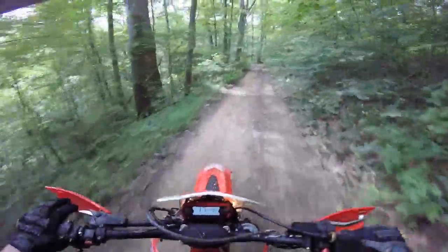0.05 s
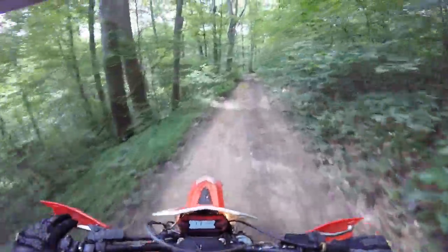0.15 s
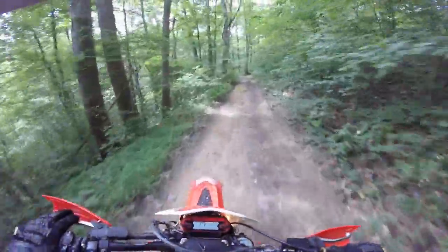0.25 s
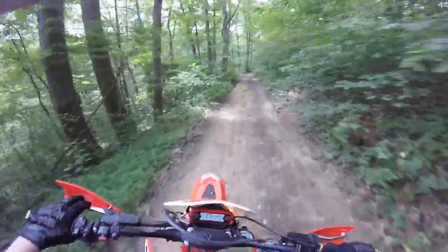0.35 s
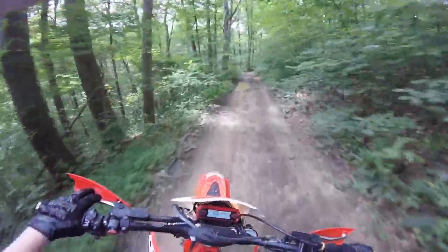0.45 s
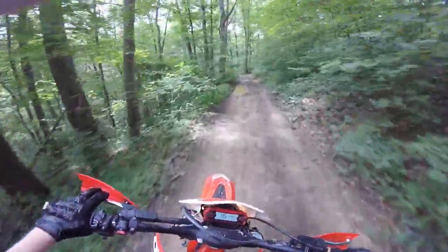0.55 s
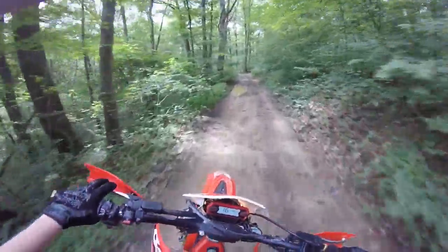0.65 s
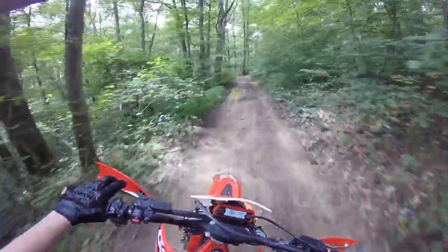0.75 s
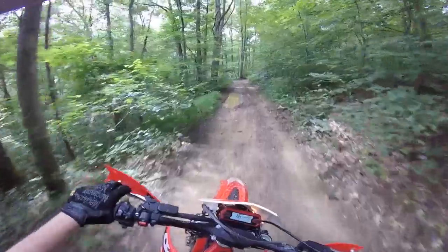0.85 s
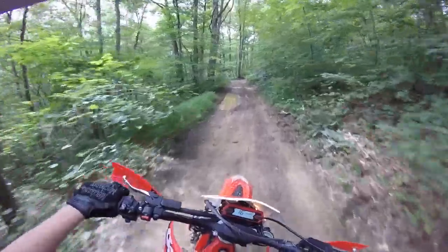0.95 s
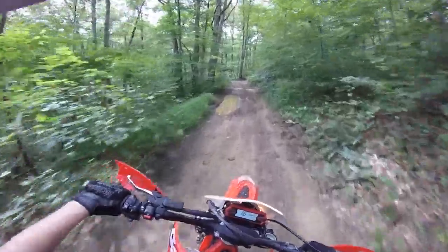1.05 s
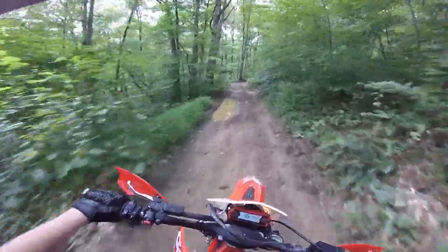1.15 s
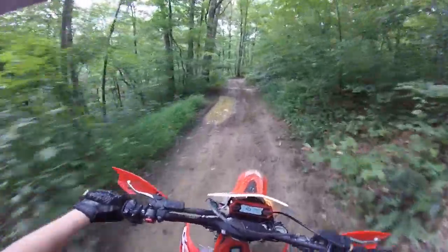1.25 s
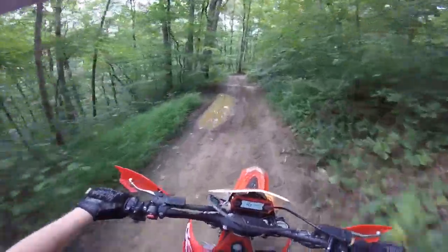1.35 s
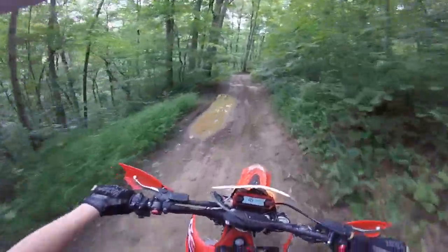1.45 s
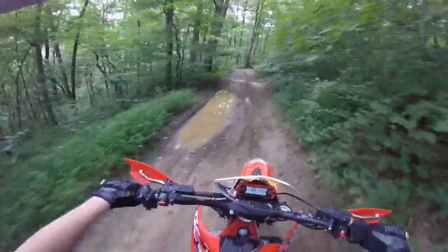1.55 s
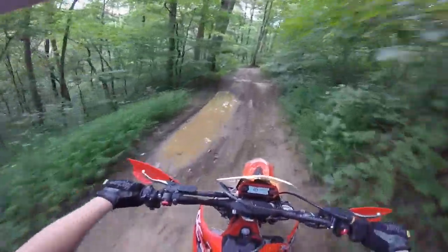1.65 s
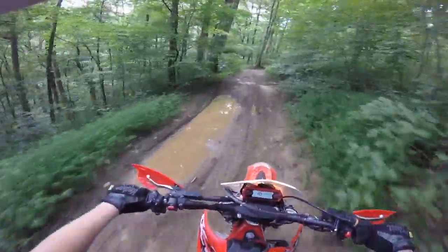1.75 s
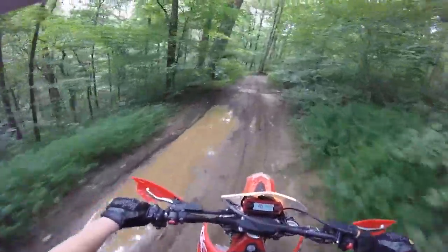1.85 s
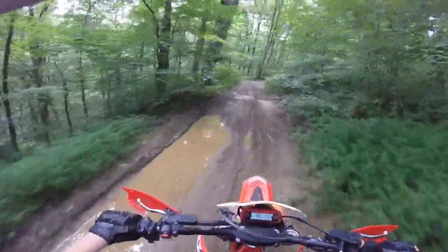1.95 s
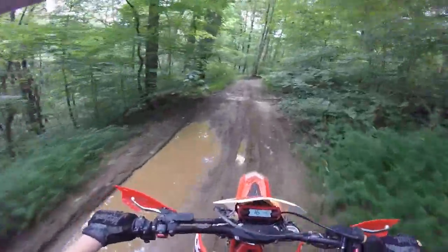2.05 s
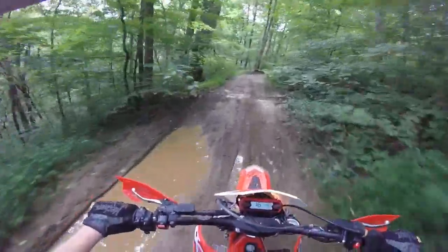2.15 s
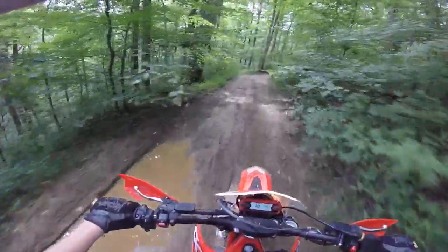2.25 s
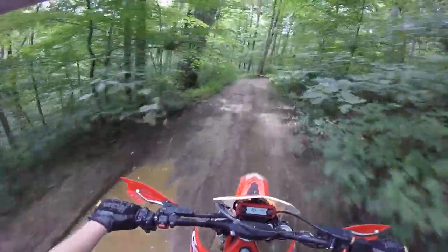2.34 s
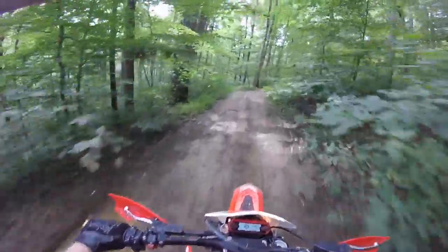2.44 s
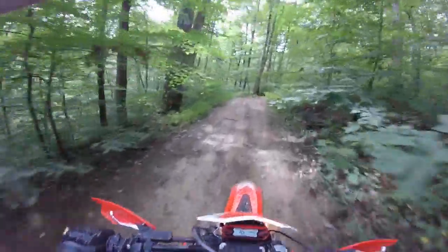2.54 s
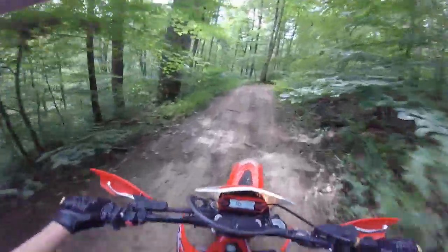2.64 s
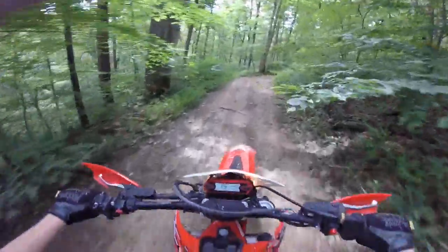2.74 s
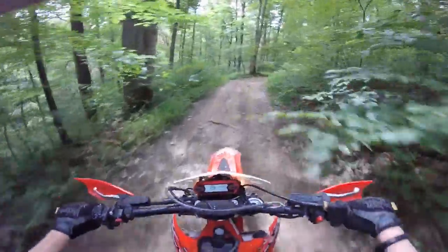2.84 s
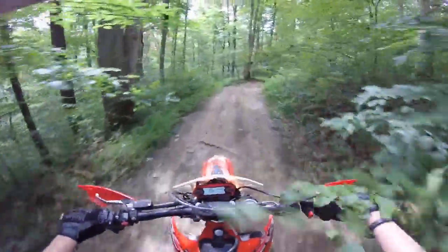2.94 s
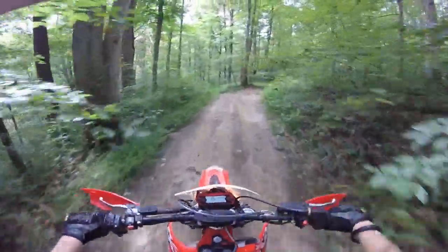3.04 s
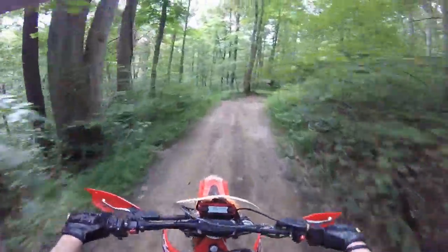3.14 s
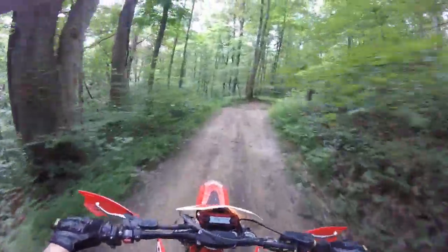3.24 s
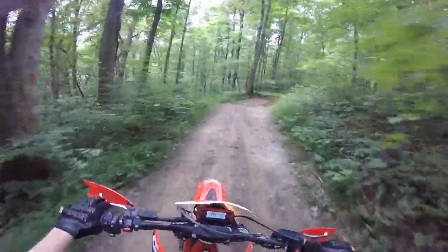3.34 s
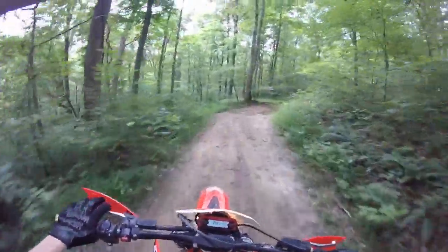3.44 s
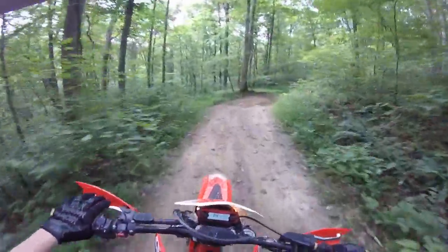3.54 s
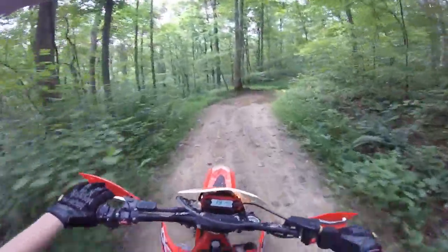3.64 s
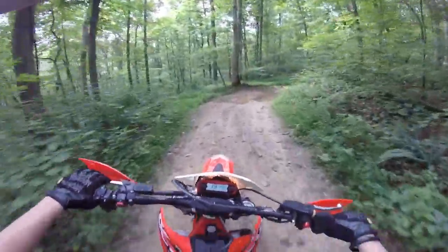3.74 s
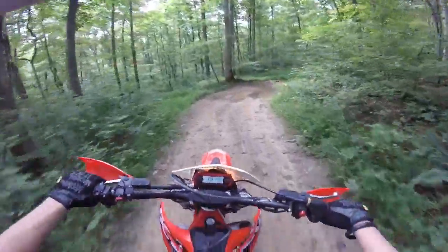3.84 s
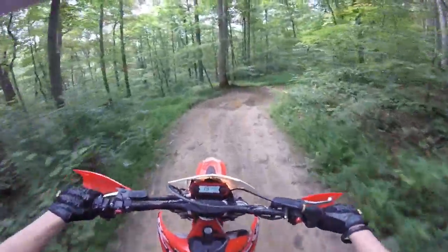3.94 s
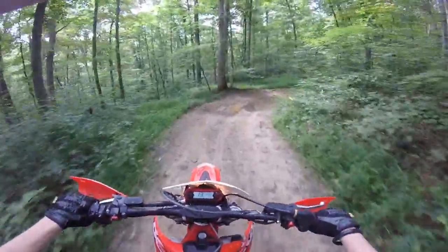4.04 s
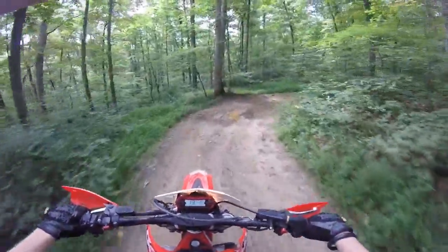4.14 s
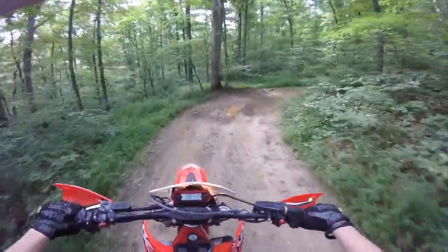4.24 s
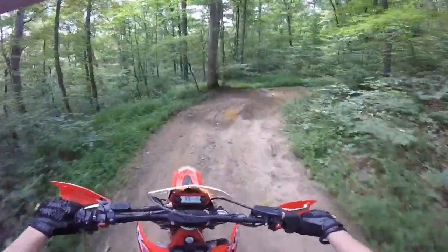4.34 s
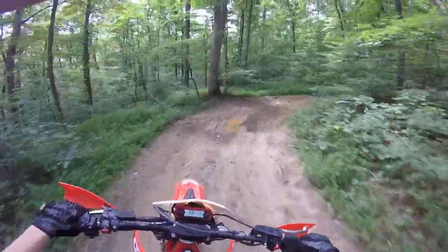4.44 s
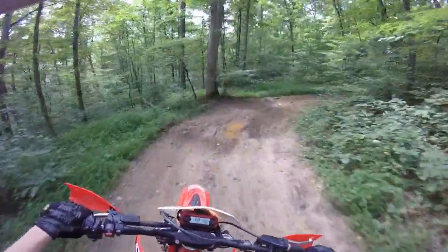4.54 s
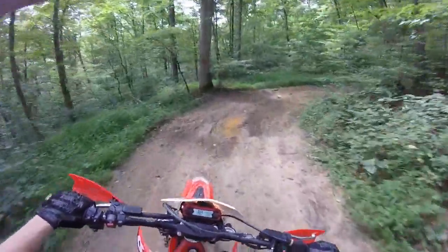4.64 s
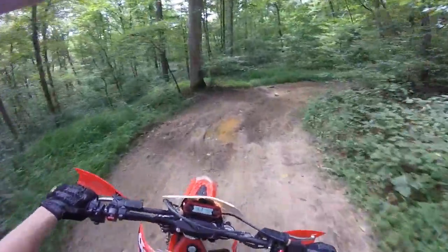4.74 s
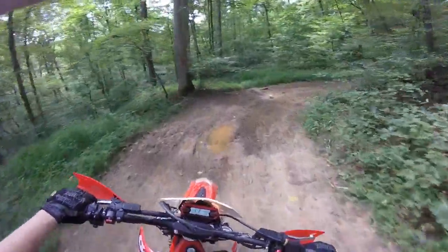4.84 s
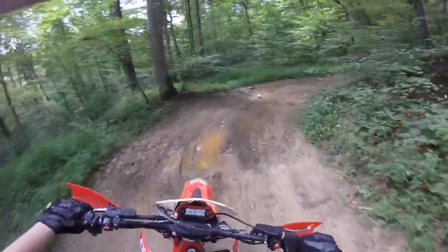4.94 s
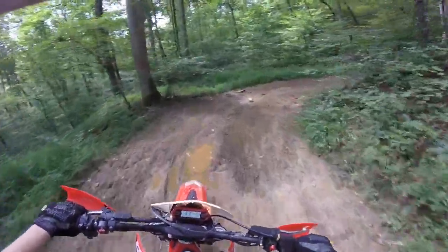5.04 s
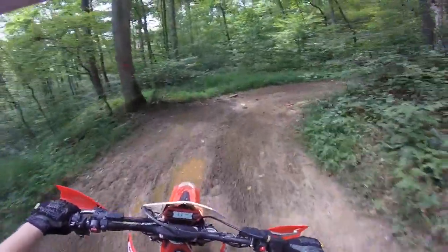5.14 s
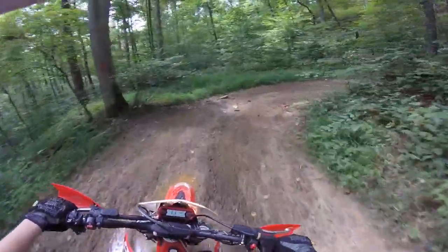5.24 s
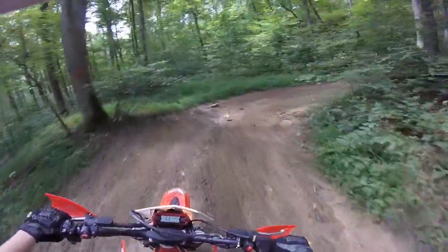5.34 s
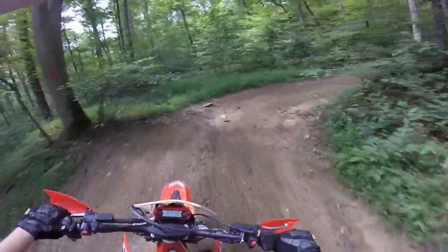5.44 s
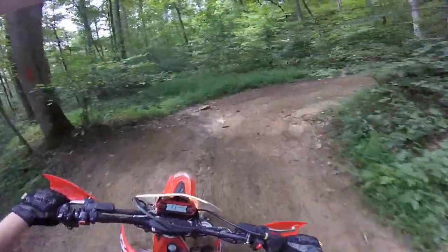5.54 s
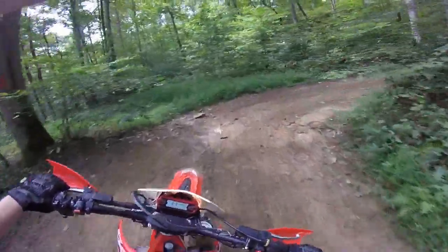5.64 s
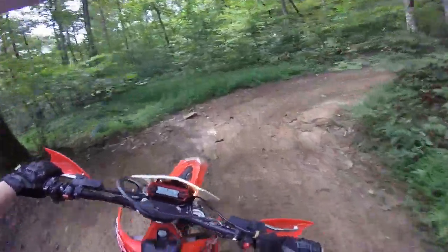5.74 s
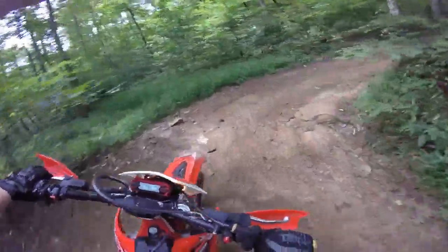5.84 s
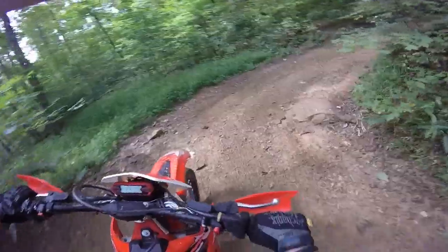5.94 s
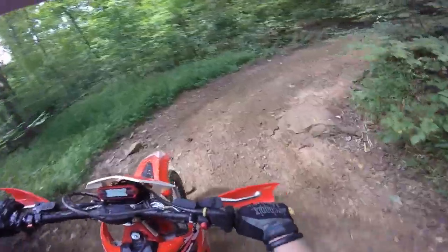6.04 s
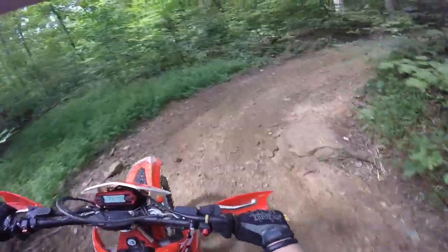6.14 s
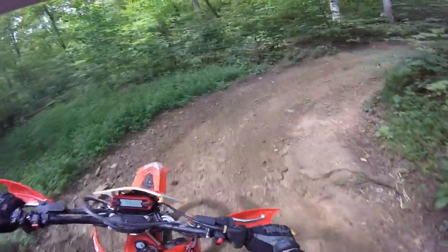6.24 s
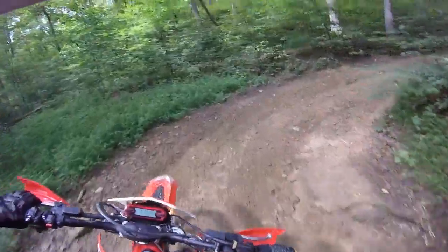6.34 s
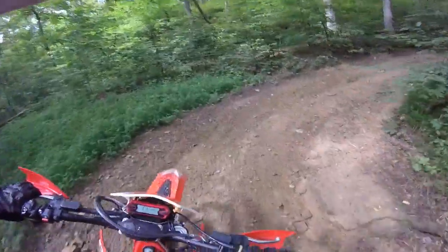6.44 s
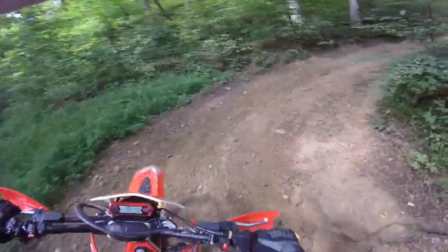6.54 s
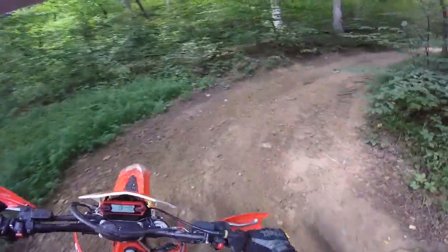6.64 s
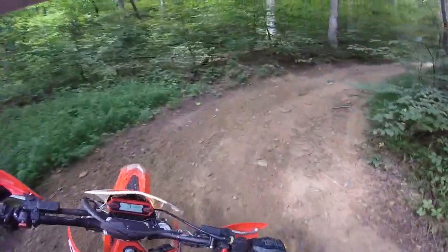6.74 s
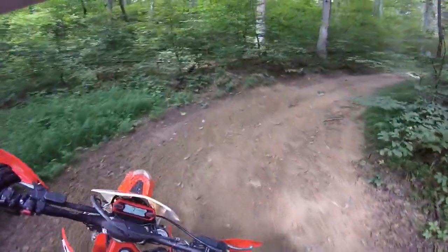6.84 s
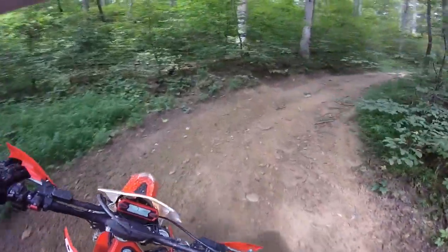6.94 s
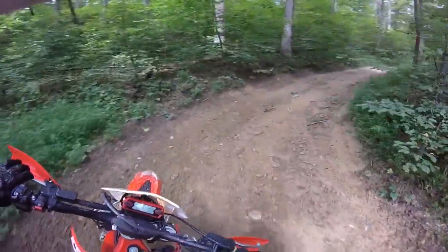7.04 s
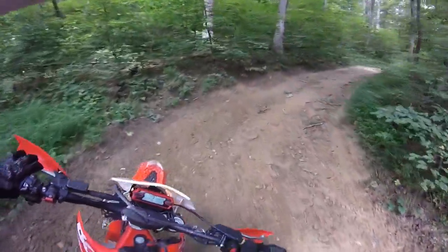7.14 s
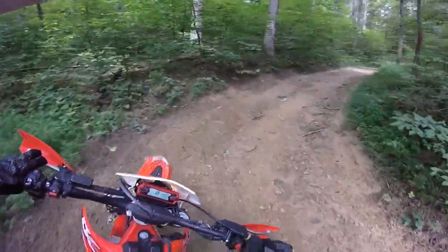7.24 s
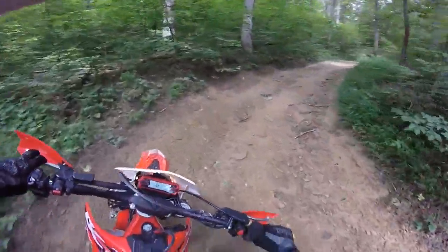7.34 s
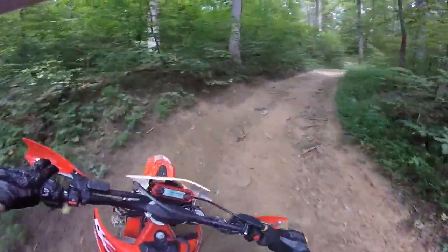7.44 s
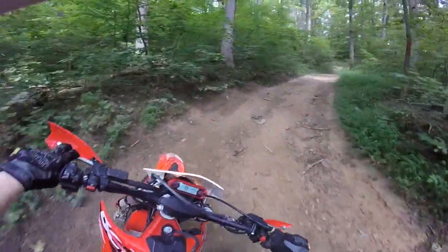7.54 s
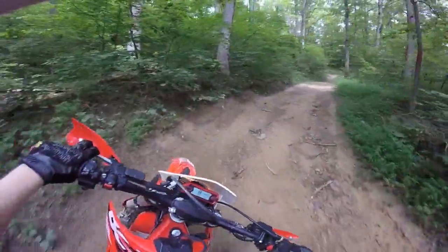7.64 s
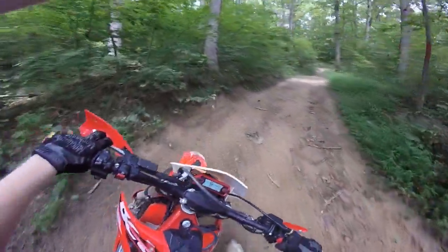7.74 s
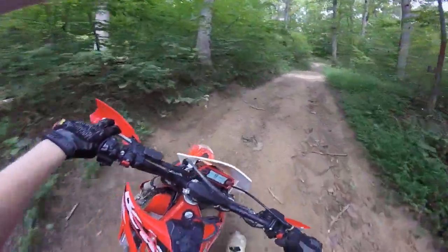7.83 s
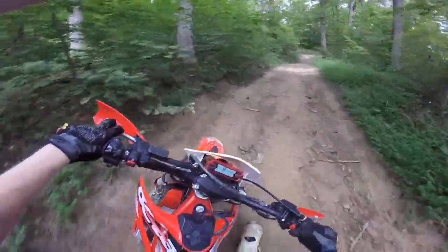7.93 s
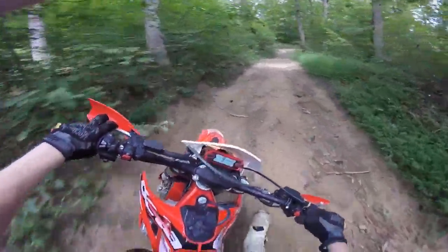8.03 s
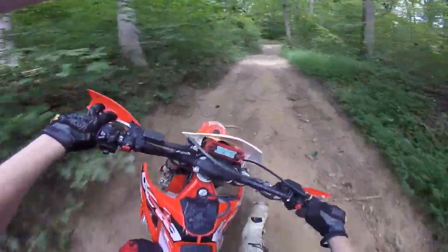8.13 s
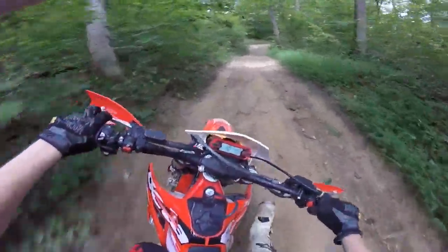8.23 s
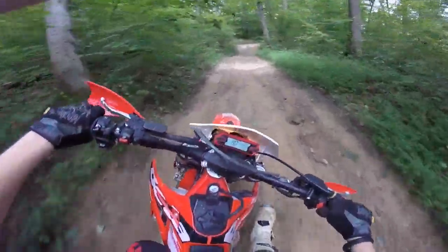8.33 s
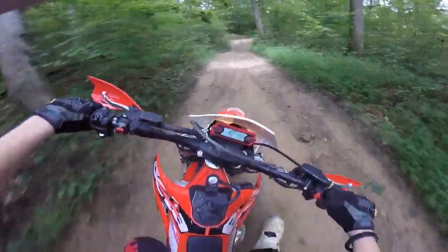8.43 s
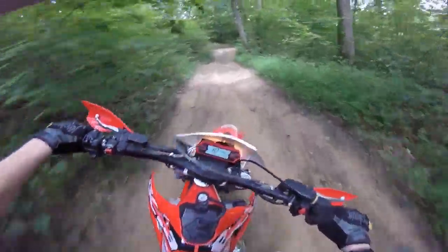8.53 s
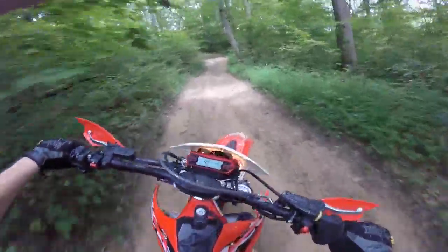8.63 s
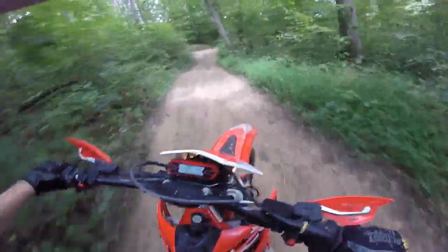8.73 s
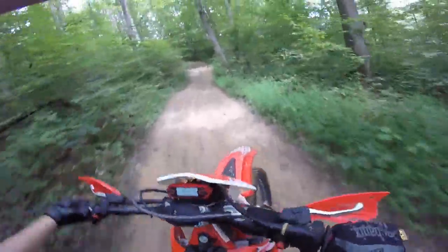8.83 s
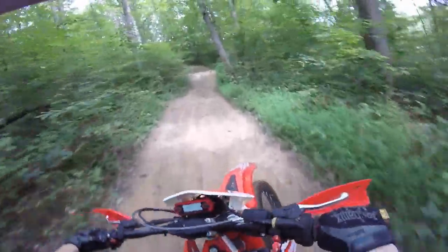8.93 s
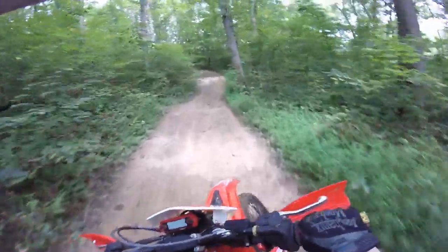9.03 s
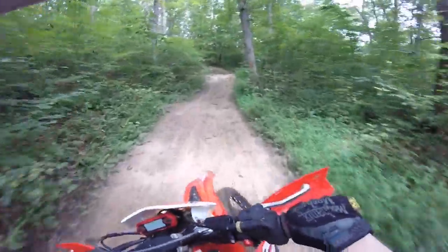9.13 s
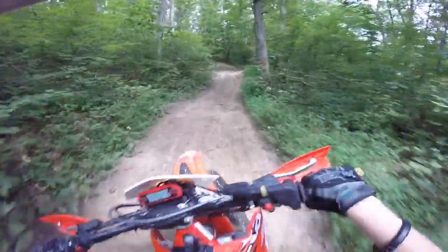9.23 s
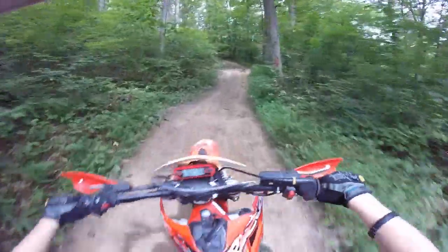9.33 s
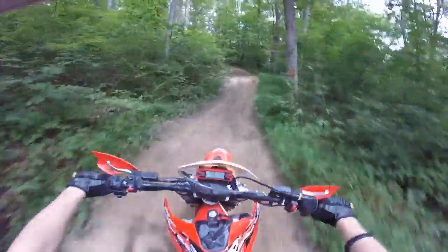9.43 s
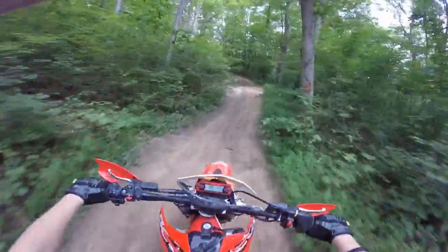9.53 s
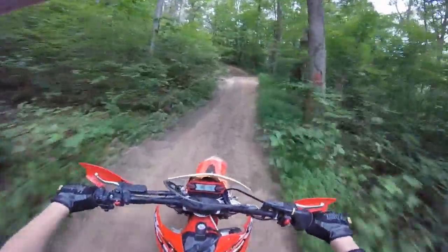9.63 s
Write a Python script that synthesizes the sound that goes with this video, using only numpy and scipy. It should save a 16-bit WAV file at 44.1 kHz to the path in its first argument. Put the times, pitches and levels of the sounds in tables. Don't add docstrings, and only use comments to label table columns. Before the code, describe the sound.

Close on-board sound of a small two-stroke dirt bike on a wooded dirt trail, slightly boxed in by a helmet camera housing. The engine hums off throttle with irregular popping, slowing toward a bend amid chain rustle, low wind and grit ticks. Bumps knock around four seconds, the tyre scrapes gravel just after five, then the engine burbles, blips and pulls up to a high buzzing rasp.

```python
import sys
import numpy as np
from scipy import signal
from scipy.io import wavfile
from scipy.ndimage import uniform_filter1d

SR = 44100
rng = np.random.default_rng(int(sys.argv[2]) if len(sys.argv) > 2 else 0)


def transcribe(signal):
    frames = np.atleast_2d(signal).T
    limited = np.clip(frames, -1, 1)
    pcm = np.round(limited * 32767).astype(np.int16)
    wavfile.write(sys.argv[1], SR, pcm)


def volts_from_db(level):
    exponent = np.asarray(level, float) / 20
    return 10 ** exponent


N = 426888
TIME = np.arange(N) / SR


def rms_one(x):
    return x / np.sqrt(np.mean(x ** 2) + 1e-20)


def in_time(rows, outside=None):
    s, *columns = np.transpose(rows)
    return [np.interp(TIME, s, c, outside, outside) for c in columns]


def span(from_s, to_s, edge_s):
    inside_s = np.minimum(TIME[::40] - from_s, to_s - TIME[::40])
    return np.clip(inside_s / edge_s + .5, 0, 1)


def drift(rate_hz):
    r = np.exp(-80 * np.pi * rate_hz / SR)
    white = rng.standard_normal(N // 40 + 2002)
    slow = signal.lfilter([1], [1, -2 * r, r * r], white)[2000:]
    return np.interp(np.arange(N) / 40, np.arange(len(slow)), rms_one(slow))


def train(at, sizes):
    out = np.full(N, 1e-18)
    np.add.at(out, np.clip(at, 0, N - 1).astype(int), sizes)
    return out


def ring(clicks, hz, t60_s):
    r, w = volts_from_db(-60 / (t60_s * SR)), 2 * np.pi * hz / SR
    return signal.lfilter([0, np.sin(w)], [1, -2 * r * np.cos(w), r * r], clicks)


def stamp(clicks, shape):
    ms = np.arange(-1500, 1501) * 1000 / SR
    return signal.oaconvolve(clicks, shape(ms), "same")


def bandpass(x, low_hz, high_hz):
    return signal.sosfilt(signal.butter(2, [low_hz, high_hz], "band", fs=SR, output="sos"), x)


def resonate(x, hz, width_hz):
    return signal.lfilter(*signal.iirpeak(hz, hz / width_hz, fs=SR), x)


def noise(spectrum, patchy_db):
    hz, db = np.transpose(spectrum)
    bands = int(2.5 * np.log2(hz[-1] / hz[0]))
    edges = np.geomspace(hz[0], min(hz[-1], .45 * SR), bands + 1)
    white, together, out = rng.standard_normal((2, N)), drift(0.57), 0
    for k, (low, high) in enumerate(zip(edges, edges[1:])):
        band = bandpass(white[k % 2], low, high)
        level_db = np.interp(np.log(low * high) / 2, np.log(hz), db)
        out = out + band * volts_from_db(level_db + patchy_db * (0.37 * together + drift(7.3)))
    return rms_one(out)


# (time [s], speed [turns/s])
CRANK_SPEED = [(0.0, 52.5), (1.0, 51.7), (1.32, 50.0), (1.65, 52.3), (2.0, 49.8), (2.75, 49.6),
               (3.21, 40.7), (3.39, 45.0), (3.67, 42.2), (4.18, 37.6), (4.8, 35.3), (5.6, 34.4),
               (5.9, 36.9), (6.17, 44.0), (6.73, 49.4), (6.88, 44.8), (7.39, 40.2), (9.68, 60.8)]
# (time [s], speed [turns/s], firing [dB], exhaust hiss [dB])
PULLS = [
    [(7.1, 44.5, -27.5, -44), (7.27, 41.5, -31, -42.5)],
    [(7.75, 44.9, -26, -44), (7.9, 45.8, -27.5, -38.5), (8.0, 52.0, -22, -40.5), (8.07, 55.2, -25.5, -46),
     (8.19, 50.8, -37, -50)],
    [(8.19, 50.8, -30, -46), (8.27, 56.6, -26, -42.5), (8.34, 54.6, -31, -48), (8.41, 59.4, -23.5, -44),
     (8.54, 61.8, -25.5, -45), (8.63, 67.8, -26.5, -42.5), (8.75, 70.5, -24.5, -41)],
    [(9.09, 58.5, -28, -63), (9.11, 59.0, -19, -42), (9.15, 63.0, -20.5, -43), (9.2, 75.5, -26, -46),
     (9.25, 81.5, -21.5, -44.5), (9.34, 74.8, -27.5, -43), (9.47, 73.6, -23.5, -43)],
]
# (first [s], last [s], firings
# [count], pop peak [dB], hiss [dB])
MISFIRE_RUNS = [(1.3665, 1.443, 3, -2.5, -38), (1.4608, 1.5738, 4, -1, -37), (1.6324, 1.7085, 3, -1, -37.5),
                (1.766, 1.804, 2, -1.5, -41.5), (1.8236, 1.8803, 2, -2, -37.5),
                (2.919, 2.9548, 2, -1.5, -34), (4.5341, 4.618, 2, -5.5, -54), (4.8114, 4.978, 2, -1.5, -32),
                (5.175, 5.3159, 2, -3, -37), (5.4567, 5.6334, 4, -5, -40), (5.8832, 6.2341, 6, -2.2, -34.5),
                (6.5102, 6.595, 3, -0.4, -32.5), (6.735, 6.8806, 2, -14.5, -39.5),
                (6.975, 7.0246, 2, -1, -35.5), (7.2983, 7.5421, 6, -3.5, -34),
                (7.589, 7.7361, 4, -4, -36.5), (9.4869, 9.611, 3, -2.2, -41.5)]
# (time [s], pop peak [dB], exhaust hiss [dB])
LONE_POPS = [(1.349, -4, -40), (1.7475, -4, -41), (2.5209, 1, -35), (2.614, 1.5, -39), (2.6317, -1, -39),
             (3.0165, -13, -34), (4.264, 0, -32.5), (5.805, -5.5, -41), (6.3242, -7.5, -36.5),
             (6.6567, -5, -40), (7.0905, -4, -40), (8.7705, -5, -36)]
POP_SPREAD_DB, FLYWHEEL_S = 1.0, .03


def crank():
    rate_hz, = in_time(sorted(CRANK_SPEED + [row[:2] for rows in PULLS for row in rows]))
    rate_hz = uniform_filter1d(rate_hz, size=int(FLYWHEEL_S * SR))
    free = np.cumsum(rate_hz) / SR
    turn, last, marks, pops = 0, 0, [], []
    lone_runs = [(s, s, 1, *db) for s, *db in LONE_POPS]
    for first_s, last_s, count, *db in sorted(MISFIRE_RUNS + lone_runs):
        start, end = np.interp([first_s, last_s], TIME, free)
        turn += max(round(start - last), 1)
        step = round((end - start) / max(count - 1, 1))
        pops += [(turn + step * k, *db) for k in range(count)]
        marks += [(start, turn - start), (end, pops[-1][0] - end)]
        turn, last = pops[-1][0], end
    angle = free + np.interp(free, *np.transpose(marks))
    pops = np.array(pops)
    pops[:, 0] = np.interp(pops[:, 0], angle, TIME)
    pops[:, 1:] += POP_SPREAD_DB * rng.standard_normal((len(pops), 2))
    return angle, rate_hz, pops


def passes(angle, share):
    return np.interp(np.arange(1, int(angle[-1])) + share, angle, np.arange(N)).astype(int)


# (from [s], to [s], puff boost [dB], puff pitch [Hz], puff decay [ms])
THROTTLE = [(1.357, 1.895, 4.5, 236, 10.4), (1.918, 2.03, -6, 283, 4.1), (2.5, 2.646, 4, 270, 2.5),
            (2.853, 2.946, 11, 296, 4.1), (4.35, 5.2, 2, 302, 1.9), (5.2, 5.794, 2, 330, 4.2),
            (5.801, 6.26, 8.5, 291, 2.7), (6.446, 6.63, 7, 273, 3.7), (6.94, 7.275, 10, 269, 16),
            (7.275, 7.75, 14, 264.4, 12), (7.758, 7.986, 13, 265, 16), (8.003, 8.48, 13, 281, 3.6),
            (8.476, 8.73, 12, 268, 7.1), (8.793, 9.087, -11, 300, 7.1), (9.095, 9.21, 8.5, 265, 20),
            (9.19, 9.397, 0, 320, 21), (9.4, 9.48, -2, 270, 4.2), (9.492, 9.7, -5, 262, 9.3)]
THROTTLE_MOVE_S, COAST_HZ, COAST_DECAY_MS = 0.051, 294, 5.5


def throttle():
    out = np.array([[0], [COAST_HZ], [COAST_DECAY_MS]])
    for from_s, to_s, boost_db, hz, ms in THROTTLE:
        change = [boost_db, hz - COAST_HZ, ms - COAST_DECAY_MS]
        out = out + np.outer(change, span(from_s, to_s, THROTTLE_MOVE_S))
    return [np.interp(TIME, TIME[::40], row) for row in out]


ROUGH_COAST, ROUGH_MISFIRE, ROUGH_PULL = .08, .2, .04


def roughness():
    misfire = np.max([span(row[0] - .1, row[1] + .1, .1) for row in MISFIRE_RUNS], axis=0)
    load = np.max([span(rows[0][0], rows[-1][0], .05) for rows in PULLS], axis=0)
    off_load = ROUGH_COAST + (ROUGH_MISFIRE - ROUGH_COAST) * misfire
    return np.interp(TIME, TIME[::40], off_load * (1 - load) + ROUGH_PULL * load)


# (frequency [Hz], level [dB], t60 [s])
PIPE = [(94, -16.5, 0.019), (241, -10.5, 0.014), (425.7, -12, 0.1), (609.5, -6, 0.027), (707, -15.5, 0.061),
        (1384, -20.5, 0.025)]


def firing(at, size):
    out = stamp(train(at, size), lambda ms: np.exp(-(ms / .5) ** 2))
    for k, (hz, level_db, t60_s) in enumerate(PIPE):
        strikes = train(at + int(0.00078 * SR), size * volts_from_db(level_db + rng.normal(0, 1, len(at))))
        out = out + (-1) ** k * ring(strikes, hz, t60_s)
    return bandpass(out, 45, 1500)


LAZY_HZ = 38
LAZY_RING_HZ, LAZY_T60_S, LAZY_RING_DB = 330, 0.042, 3


def lazy_pops(pops):
    clicks = train(pops[:, 0] * SR, volts_from_db(pops[:, 1] + LAZY_RING_DB))
    push = stamp(clicks, lambda ms: np.exp(-(ms / 0.21) ** 2))
    return 0.4 * push + ring(push / (.0008 * SR), LAZY_RING_HZ, LAZY_T60_S)


# (frequency [Hz], level [dB/Hz])
BLOWDOWN = [(1500, 1), (3000, 0), (5000, -10.5), (7000, 4.5), (9000, -25.5), (12000, 14), (15500, -55)]


def blowdown(at, size):
    def puff(ms):
        return np.exp(-np.maximum(ms, 0) / 8.8 - (np.minimum(ms + 1.8, 0) / 2.9) ** 2)
    return stamp(train(at, size), puff) * noise(BLOWDOWN, patchy_db=2.0)


# (order [multiple of crank], level [dB re firing])
LOW_ORDERS = [(1, -3), (2, -7.5), (3, -19), (7, -4), (8, 2)]
BARK_HZ, BARK_T60_S, BARK_DB = 632, .06, -10


def exhaust(angle, opens, rough, pops, lazy):
    s, pop_db, pop_hiss_db = pops.T
    load_db, flow_db = np.max([in_time(rows, outside=-120)[1:] for rows in PULLS], axis=0)
    uneven_db = 5 * rough[opens] * rng.standard_normal(len(opens))
    fire_db = load_db[opens] + 17.5 + uneven_db
    at = np.concatenate([s * SR, opens]).astype(int)
    throb = sum(volts_from_db(level_db) * np.sin(2 * np.pi * order * angle) for order, level_db in LOW_ORDERS)
    throb = throb * uniform_filter1d(volts_from_db(load_db), size=1500)
    bark = ring(train(s * SR + 60, volts_from_db(pop_db + BARK_DB) * ~lazy), BARK_HZ, BARK_T60_S)
    hiss = blowdown(at, volts_from_db(np.r_[pop_hiss_db + 3.0, flow_db[opens] + 5.0]))
    fired = firing(at, volts_from_db(np.r_[pop_db - 1.5 - 9.0 * lazy, fire_db]))
    return fired + lazy_pops(pops[lazy]) + bark + hiss + throb


PUFF_DB = -8.5


def pumping(angle, opens, puff_db, rough, pitch_hz, decay_ms):
    chance = rng.standard_normal((len(opens), 2))
    start = opens + chance[:, 0] * rough[opens] * .0008 * SR
    size = volts_from_db(puff_db[opens] + 10.4 * rough[opens] * chance[:, 1])
    out = 0
    for back in (-1, 0, 1):
        turn = np.clip(np.round(angle).astype(int) - 1 - back, 0, len(opens) - 1)
        ms = (np.arange(N) - start[turn]) * 1000 / SR + 1.66
        swell = np.exp(-(np.minimum(ms, 0) / 2.96) ** 2 - np.maximum(ms - 1.5, 0) / decay_ms)
        out = out - size[turn] * swell * np.cos(2 * np.pi * pitch_hz[opens][turn] * ms / 1000)
    return out


# (speed [turns/s], piston knock [dB], reed snap [dB])
BY_SPEED = [(34, -28, -29), (37, -28, -17), (41.25, -33, -16), (45.2, -33, -15), (50.5, -40, -21),
            (60, -37, -38), (80.4, -35, -32)]


def speed_levels(rate_hz, gain_db):
    speeds_hz, *levels_db = np.transpose(BY_SPEED)
    return [gain_db + np.interp(rate_hz, speeds_hz, db) for db in levels_db]


# (frequency [Hz], level [dB], t60 [s])
CYLINDER = [(1273, 10, 0.039), (1960, 16.5, 0.0034), (3100, 10.5, 0.013), (3248, 6.5, 0.041),
            (4460, -19, 0.0062), (6550, -9, 0.021), (6930, -3.5, 0.013)]
KNOCK_TURN = .46


def knock(tops, knock_db, pops):
    strength_db = knock_db[tops] + 1.5 * rng.standard_normal(len(tops))
    s, pop_db, _ = pops.T
    strength_db[np.searchsorted(tops, s * SR) - 1] += np.clip(pop_db + 6.0, 0, 6.0)
    rattle = stamp(train(tops, volts_from_db(strength_db)), lambda ms: np.clip(ms / 1.5, 0, 1) * np.exp(-np.abs(ms) / 5))
    steady_floor = volts_from_db(knock_db - 22.0)
    slap = train(tops + 60, volts_from_db(strength_db + 12.0))
    clicks = (rattle + steady_floor) * rng.standard_normal(N) + slap
    return sum(volts_from_db(level_db - 19.5) * ring(clicks, hz, t60_s) for hz, level_db, t60_s in CYLINDER)


PING_HZ, PING_T60_S, PING_DB, PING_FOLLOWS, PING_LEAD_S = 3100, .04, -44.5, 1.6, 0.012


def pings(pops, boost_db):
    at = ((pops[:, 0] - PING_LEAD_S) * SR).astype(int)
    return ring(train(at, volts_from_db(pops[:, 1] + PING_DB + PING_FOLLOWS * boost_db[at])), PING_HZ, PING_T60_S)


# (frequency [Hz], level [dB], t60 [s])
REED = [(1180, -6, 0.028), (1346, 1.5, 0.021)]
REED_FOLLOWS = -.45


def reed(tops, reed_db):
    clicks = train(tops, volts_from_db(reed_db[tops] + rng.normal(0, 1, len(tops))))
    return sum(volts_from_db(level_db) * ring(clicks, hz, t60_s) for hz, level_db, t60_s in REED)


# (frequency [Hz], level [dB], t60 [s])
AIRBOX = [(385.4, -6, 0.083), (507, -2, 0.052), (631, -3, 0.032), (1207, -14.5, 0.036), (1335, -7, 0.017)]
GULP_DB, GULP_FOLLOWS = -12.5, 0.53
FAST_HZ, GULP_DB_PER_HZ = 61, 0.39


def intake(tops, gulp_db, rough):
    out = 0
    for hz, level_db, t60_s in AIRBOX:
        late, louder = rough[tops] * rng.standard_normal((2, len(tops)))
        gulps = train(tops + late * .0005 * SR, volts_from_db(gulp_db[tops] + level_db + 6 * louder))
        out = out + ring(gulps, hz, t60_s)
    return bandpass(out, 280, 1500)


SHAKE_DB, SHAKE_FOLLOWS, FRAME_HZ, FRAME_WIDTH_HZ = -21, 0.41, 97, 21


def frame_shake(angle, rate_hz, gain_db, boost_db):
    frame = 1 / (1 + ((2 * rate_hz - FRAME_HZ) / FRAME_WIDTH_HZ) ** 2)
    orders = np.sin(4 * np.pi * angle) + 0.36 * np.sin(2 * np.pi * angle)
    return frame * volts_from_db(SHAKE_DB + gain_db + SHAKE_FOLLOWS * boost_db) * orders


BUZZ_HZ, BUZZ_WIDTH_HZ, BUZZ_FROM_HZ, BUZZ_DB = 6150, 300, 57, -48


def high_rev_buzz():
    load = np.max([in_time(rows, outside=0)[0] for rows in PULLS], axis=0) > BUZZ_FROM_HZ
    band = resonate(rng.standard_normal(N), BUZZ_HZ, BUZZ_WIDTH_HZ)
    return uniform_filter1d(load * 1., size=2000) * volts_from_db(BUZZ_DB + 4.06 * drift(5.2)) * rms_one(band)


# (frequency [Hz], level [dB/Hz])
CHAIN = [(120, -35), (250, -7.5), (400, -14), (620, -6), (780, -20.5), (1000, -19.5), (1300, -15.5),
         (1600, -29), (2200, -45)]
CHAIN_DB, CHAIN_THROB = -17, .25


def chain(angle, gain_db, boost_db):
    tug = 1 + CHAIN_THROB * np.cos(2 * np.pi * (angle - KNOCK_TURN - .15))
    return volts_from_db(CHAIN_DB + gain_db - .15 * boost_db) * noise(CHAIN, patchy_db=.7) * tug


# (frequency [Hz], level [dB/Hz])
GRAVEL = [(1500, 2), (2200, 3), (4500, -2.5), (6500, -4), (9500, -11), (15000, -23)]
SKID_FROM_S, SKID_TO_S, SKID_DB, SKID_BITE_DB, SKID_RELEASE_S = 5.3, 5.87, -32, 7, 0.045


def skid():
    since_s = np.maximum(TIME - SKID_FROM_S, 0)
    gate = np.clip(since_s / .01, 0, 1) * np.clip(1 - (TIME - SKID_TO_S) / SKID_RELEASE_S, 0, 1)
    grains = volts_from_db(2.5 * drift(40)) * noise(GRAVEL, patchy_db=2.5)
    return gate * volts_from_db(SKID_DB + SKID_BITE_DB * np.exp(-since_s / 0.073)) * rms_one(grains)


# (time [s], peak [dB], centre [Hz])
STONES = [(0.112, -15.5, 5740), (2.5087, -19.5, 3100), (2.7257, -30, 3960), (2.7644, -30, 4500),
          (2.8609, -32, 4380), (3.058, -27, 6150), (3.32, -31, 4770), (4.135, -14, 3750), (4.135, -6, 1500),
          (4.284, -20, 4020), (5.4126, -37, 5030)]


def stones():
    out = np.zeros(N)
    ms = np.arange(1500) * 1000 / SR
    for s, peak_db, hz in STONES:
        at = int(s * SR)
        burst = rng.standard_normal(len(ms)) * np.minimum(ms / 0.5, 1) * np.exp(-ms / 10.0)
        out[at:at + len(ms)] += volts_from_db(peak_db) * bandpass(burst, hz * .6, min(hz * 1.7, .45 * SR))
    return out


# (time [s], peak [dB], pitch [Hz])
JOLTS = [
    (3.822, -5, 624),
    (4.114, -6, 630),
    (4.1868, -9, 487),
    (4.1995, -4.5, 900),
    (4.7055, -5.5, 800),
]
JOLT_T60_S = 0.015


def jolts():
    return sum(ring(train(np.array([s * SR]), volts_from_db(peak_db)), hz, JOLT_T60_S) for s, peak_db, hz in JOLTS)


# (frequency [Hz], level [dB/Hz])
SPRAY = [(880, -51), (1500, -17.5), (1910, 6.5), (2580, -9), (3260, -1), (3800, -7.5), (6480, -7.5),
         (11400, -27), (15200, -39)]
SPRAY_DB, SPRAY_DUCKS = -33, 0.89


def spray(gain_db):
    return volts_from_db(SPRAY_DB + SPRAY_DUCKS * gain_db) * noise(SPRAY, patchy_db=1.5)


# (frequency [Hz], level [dB/Hz])
WIND = [(18, -20), (32, -3.5), (50, -6), (100, -2.5), (160, -5.5), (250, -26), (400, -47)]
# (time [s], level [dB])
AIR = [(0, -16), (.3, -17.5), (.5, -21), (1.35, -22), (1.5, -23.5), (3.3, -24), (4.3, -18), (4.75, -23.5),
       (5.4, -22), (5.85, -22.5), (6.9, -26), (8.2, -30), (9.3, -28), (9.68, -31)]
WIND_DUCKS = 0.51


def wind(gain_db):
    air_db, = in_time(AIR)
    return volts_from_db(air_db + WIND_DUCKS * gain_db) * noise(WIND, patchy_db=2.0)


# (time [s], level [dB])
GAIN = [(0, -1), (1.3, 0), (1.47, -9.5), (1.9, -14), (2.47, -5.5), (2.66, -9), (3.13, -12.5), (3.6, -5.5),
        (4.4, -4), (5.82, -5.5), (5.95, -10.5), (6.6, -11.5), (6.8, -14.5), (7.3, -12), (8.1, -10),
        (9.15, -13), (9.33, -5.5), (9.55, -15)]


def scene():
    angle, rate_hz, pops = crank()
    (gain_db,), rough = in_time(GAIN), roughness()
    lazy = np.interp(pops[:, 0], TIME, rate_hz) < LAZY_HZ
    boost_db, pitch_hz, decay_ms = throttle()
    puff_db = PUFF_DB + gain_db + boost_db
    gulp_db = GULP_DB + gain_db + GULP_FOLLOWS * boost_db + GULP_DB_PER_HZ * np.maximum(rate_hz - FAST_HZ, 0)
    knock_db, reed_db = speed_levels(rate_hz, gain_db)
    opens, tops = passes(angle, 0), passes(angle, KNOCK_TURN)

    engine = exhaust(angle, opens, rough, pops, lazy)
    engine = engine + pumping(angle, opens, puff_db, rough, pitch_hz, np.maximum(decay_ms, 1))
    engine = engine + knock(tops, knock_db, pops) + pings(pops, boost_db)
    engine = engine + reed(tops, reed_db + REED_FOLLOWS * boost_db) + intake(tops, gulp_db, rough)
    engine = engine + frame_shake(angle, rate_hz, gain_db, boost_db) + high_rev_buzz()
    debris = skid() + stones() + jolts()
    ride = chain(angle, gain_db, boost_db) + spray(gain_db) + wind(gain_db)
    return (engine + debris + ride)[None]


def band_limit(x):
    return signal.sosfilt(signal.butter(12, 15350, fs=SR, output="sos"), x)


# (frequency [Hz], width [Hz], share added [ratio])
HOUSING = [(1590, 793, -0.88), (2554, 340, -0.55), (4290, 136, 0.77), (6740, 430, 0.65)]
CUTOFF_HZ = 15450


def record(dry):
    x = dry
    for hz, width_hz, share in HOUSING:
        x = x + share * resonate(x, hz, width_hz)
    x = 1.2 * np.tanh(x / 1.25)
    x = signal.sosfilt(signal.cheby2(10, 40, CUTOFF_HZ, fs=SR, output="sos"), x)
    return band_limit(x)


dry = scene()
out = record(dry)
transcribe(out)
```